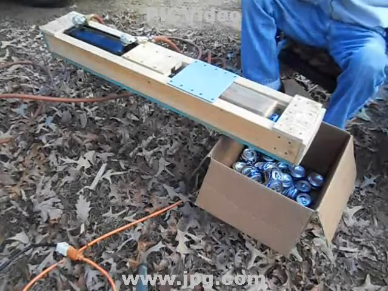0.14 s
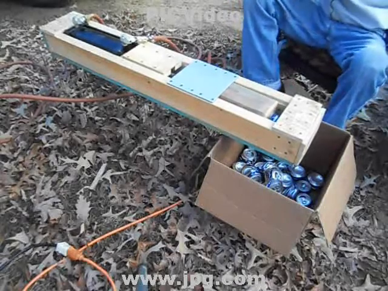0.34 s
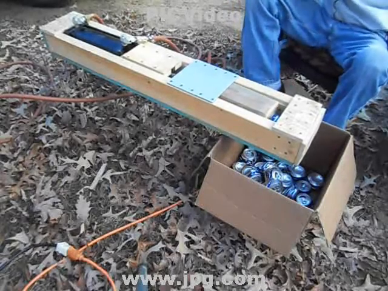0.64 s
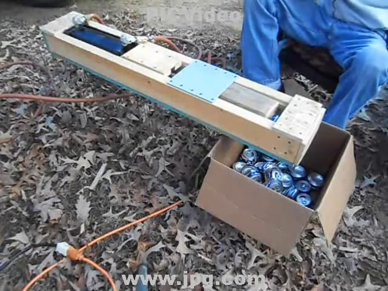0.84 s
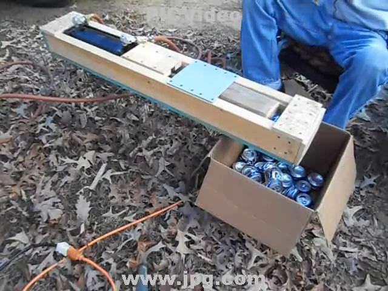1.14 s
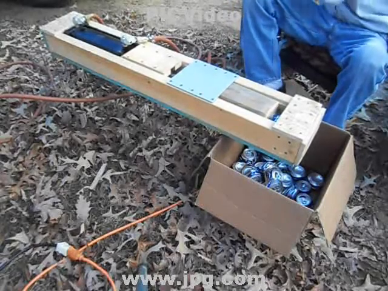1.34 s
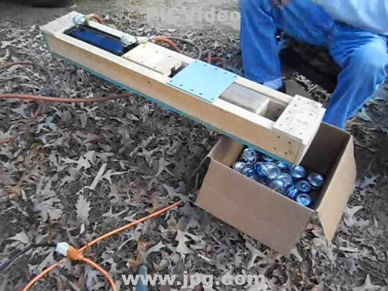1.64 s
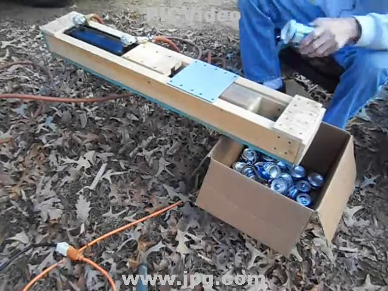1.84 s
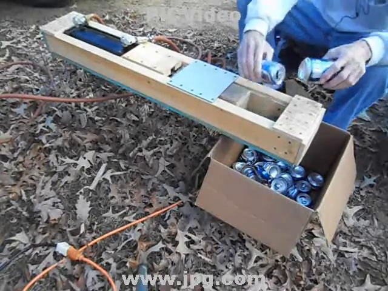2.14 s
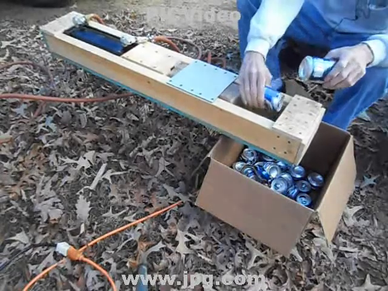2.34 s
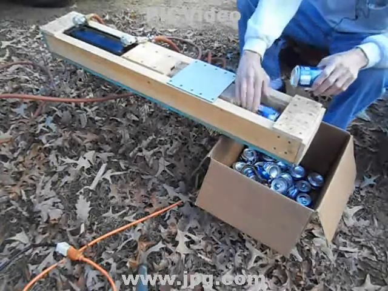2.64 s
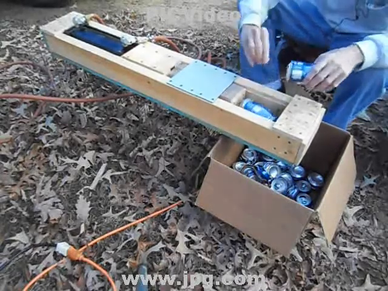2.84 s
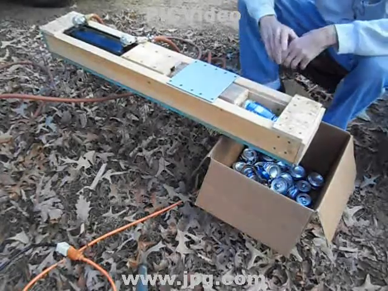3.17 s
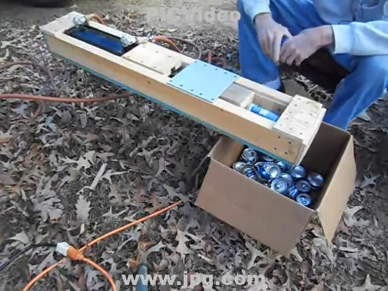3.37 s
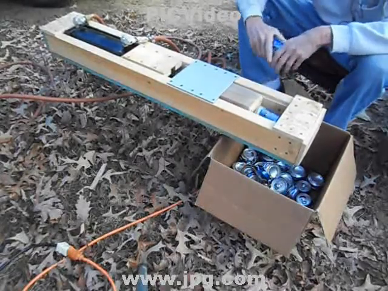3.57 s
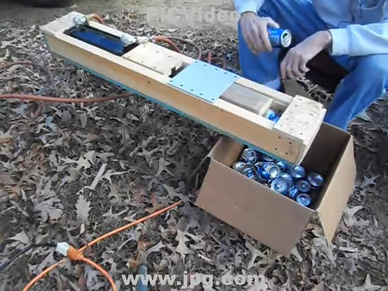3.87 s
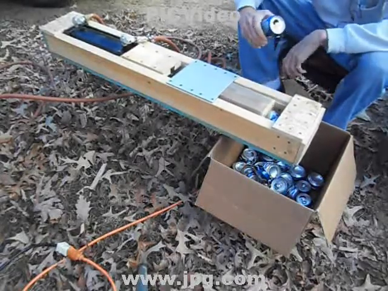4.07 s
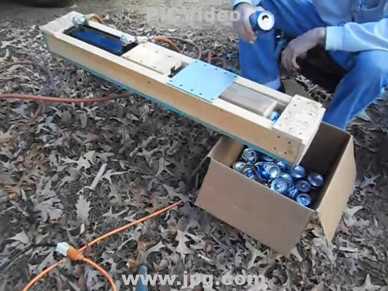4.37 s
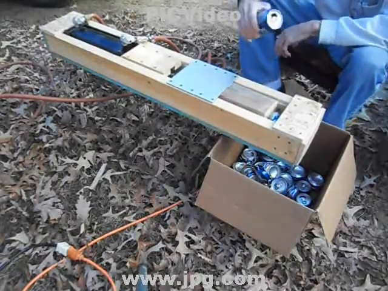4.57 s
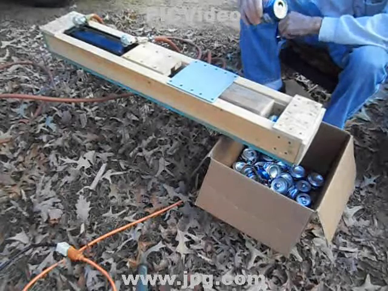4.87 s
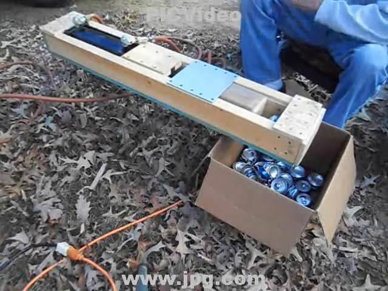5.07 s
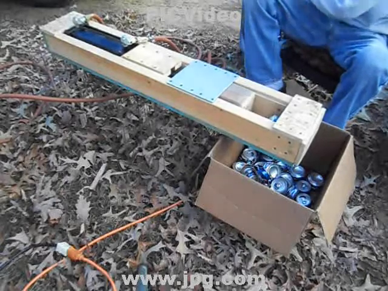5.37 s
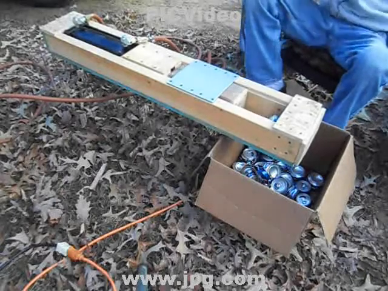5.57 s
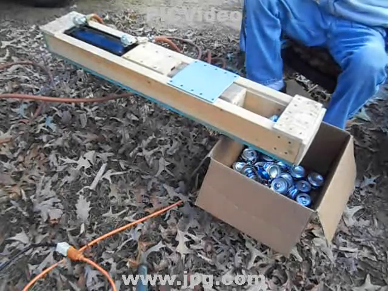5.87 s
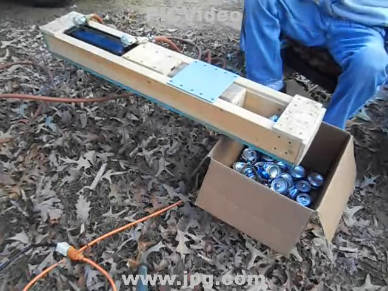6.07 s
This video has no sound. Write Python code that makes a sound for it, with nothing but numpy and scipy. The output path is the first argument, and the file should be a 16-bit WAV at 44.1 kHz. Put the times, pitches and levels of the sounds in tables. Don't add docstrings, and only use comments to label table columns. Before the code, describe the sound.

Outdoors, bursts of venting compressed air alternate with a can clattering into a wooden trough and its thin metal crackling as it is crushed.

```python
import sys
import numpy as np
from scipy import signal
from scipy.fft import rfft, irfft, next_fast_len
from scipy.io import wavfile
from scipy.ndimage import uniform_filter1d, map_coordinates

SR = 44100
rng = np.random.default_rng(int(sys.argv[2]) if len(sys.argv) > 2 else 0)


def transcribe(u):
    v = np.clip(np.atleast_2d(u).T, -1, 1)
    q = np.round(v * 32767).astype(np.int16)
    wavfile.write(sys.argv[1], SR, q)


def gain_from_db(level_db):
    decades = np.asarray(level_db, float) / 20
    return 10 ** decades


N = 273861
T = np.arange(N) / SR
FULL_FLOW_DB = -16
CONVERTER_HZ = 10850

# (time [s], level [dB])
RETURN_STROKES = [
    [(1.246, -23.5), (1.255, -16), (1.267, -9), (1.32, -13.5), (1.75, -16.8), (2.3, -15.5), (2.52, -21.5),
     (2.64, -32.5), (2.727, -48)],
    [(4.673, -51), (4.69, -17), (4.792, -16), (5.03, -18), (5.7, -17), (5.85, -23), (5.922, -31),
     (6.04, -42), (6.14, -72)],
]
# (time [s], level [dB])
CRUSH_STROKE = [
    (2.972, -39),
    (2.982, -13.5),
    (3.0, -15),
    (3.17, -19.5),
    (3.3, -21.5),
    (3.67, -23.5),
    (3.94, -29),
    (4.14, -41.5),
    (4.2, -76),
]
# (time [s], level [dB])
EARLIER_CRUSH = [
    (-0.3, -19),
    (0.0, -24.5),
    (0.012, -34),
    (0.085, -42),
    (0.13, -58),
    (0.2, -75),
]
# (frequency [Hz], width [Hz], level [dB])
RETURN_RESONANCES = [(873, 24, -8), (1347, 119, -8), (1728, 122, -6.5), (2326, 205, -5), (3410, 420, -4),
                     (4077, 340, -7.5), (4940, 330, -12), (5450, 210, -12.5), (6400, 62, -25)]
CRUSH_RESONANCES = [(1000, 250, -16), (1900, 300, -18), (2800, 220, -12), (3200, 200, -13), (4170, 240, 0),
                    (4800, 280, -1), (5370, 200, -5), (5720, 120, -9), (6000, 160, -5), (6500, 150, -11)]
# (frequency [Hz], density [dB per Hz])
JET_SPECTRUM = [(100, -59), (400, -23.5), (1500, -16), (3500, -14.5), (6000, -18), (6600, -25.5)]
# (frequency [Hz], density [dB per Hz])
RETURN_TREBLE = [(6600, 8), (6800, -1.5), (7800, -3.5), (8200, -9.5), (8600, -11), (9080, -3.5), (9500, -8),
                 (10100, 1.5), (10320, -5.5), (10600, -0.5), (10950, -15)]
CRUSH_TREBLE = [(3880, -29), (6600, 5), (6960, 0), (7620, -2), (8040, -9), (8310, -12.5), (9220, -3.5),
                (11000, -5), (14200, -37.5), (22000, -120)]
# (frequency [Hz], width [Hz], depth [0-1])
RETURN_NOTCHES = [(2735, 100, 0.67), (1990, 98, 0.4), (2650, 73, 0.3), (3880, 110, 0.7), (4600, 110, 0.5),
                  (5250, 90, 0.8), (5850, 100, 0.4), (7580, 60, .6), (8200, 200, .93), (8560, 70, .6),
                  (8810, 90, .7), (9280, 90, .5), (10300, 150, 0.3), (6620, 110, 0.5), (6400, 150, .4)]
CRUSH_NOTCHES = [(2580, 70, 0.7), (2970, 60, .5), (4545, 80, 0.6), (5150, 80, .4), (5560, 80, .5)]
# (delay [s], level [dB])
REFLECTIONS = [(.0031, -21.5), (.0074, -18), (0.0121, -21), (0.021, -18)]
# (frequency [Hz], width [Hz], relative level at opening [dB],
# gain with time [dB per s], regained as the jet weakens [dB per dB])
NARROW_TONES = [(1315, 120, -26.5, 4.5, 0.55), (3490, 260, -18.5, 5.5, 0.0337), (4120, 130, -17.5, 8, 0.02),
                (5020, 120, -26, 2.5, 0.07), (5400, 93, -26, 1.5, -0.04), (9100, 60, -29.5, -15, 0)]
# (time [s], peak [dB], relative rattle [dB], rattle t60 [s],
# relative ring [dB])
CAN_HITS = [(2.7307, -1, -6.5, 0.23, -30.5), (2.7337, -4, -6.5, 0.29, -37), (2.769, -15.5, 4, 0.047, -12),
            (2.826, -15.5, -22, .08, -32), (2.838, -20, -24, .08, -38), (2.9092, -16, 3, 0.02, -32),
            (2.9125, -9.5, -8.5, 0.15, -25.5), (2.986, -16.5, -1, 0.033, -19.5), (2.99, -14, 0, 0.17, -22),
            (3.225, -11.5, -5, 0.15, -40), (3.293, -13, 0, 0.18, -38), (3.356, -25, -9, .03, -30),
            (3.3645, -6.5, -2, 0.11, -38.5), (3.479, -16.5, -3, 0.083, -36), (3.593, -27, 9, 0.03, -31)]
# (frequency [Hz], level [dB], t60 [s])
CAN_MODES = [(780, -4, .2), (1103, -1, .7), (1176, -4, .5), (1433, -3, .42), (1540, -15, .17),
             (1670, -7, .1), (1836, -7, .12), (2201, -5, 1.5), (2890, 0, .12), (2995, 4, .15),
             (3311, 5, .08), (3623, -4, .14), (4097, 0, .13), (4335, 6, .13)]
# (time [s], peak [dB], dullness [dB], t60 [s])
WALL_BUCKLES = [(3.3695, -16, 7, 0.045), (3.3765, -22, 6, 0.038), (3.385, -26, 6, .02),
                (3.497, -27, 16, 0.017), (3.5496, -16, 6.5, 0.03), (3.5555, -31, 5, .015),
                (3.617, -33, 13, 0.013), (3.6263, -19, 3.5, 0.007), (3.749, -27, -8, 0.033),
                (3.7567, -20, 2.5, 0.013), (3.787, -6, -3, 0.02), (3.7966, -13.5, 5.5, 0.019),
                (3.823, -29.5, 17, 0.019), (3.833, -6.5, -17, 0.024), (3.848, -30, 7, 0.021),
                (3.951, -14.5, -25, 0.019), (3.964, -15, -27, 0.0073), (3.9701, -26.5, 4, 0.023),
                (4.016, -29, 12.5, 0.0072), (4.0252, -36, 11, 0.014), (4.059, -7.5, -15.5, 0.015),
                (4.1418, -24, -30, 0.0184), (4.15, -13.5, -14.5, 0.016), (4.203, -37, 5, 0.017)]
# (time [s], peak [dB], dullness [dB], t60 [s], pitch [Hz])
VALVE_TICKS = [(0.0, -22, 3.5, 0.0071, 7600), (0.0293, -23, -25, 0.033, 7000), (0.04, -30, -8, 0.022, 8500),
               (0.0445, -34, 5, 0.028, 7000), (0.0677, -25.5, -19, 0.021, 7900),
               (0.091, -25.5, -17, 0.015, 7440), (0.1114, -38, -19, 0.03, 6600),
               (0.2285, -52, -4, 0.025, 8000), (0.2614, -37, -18, 0.05, 7300),
               (0.407, -28.5, -7, 0.029, 7260), (0.4322, -27, -31, 0.023, 6040),
               (0.6525, -22.5, -39, 0.021, 7300), (0.728, -9, -32, 0.02, 6900),
               (0.7285, -17, -36, 0.016, 5700), (0.784, -44, -11, 0.025, 7000),
               (0.8125, -21.5, -34, 0.029, 7900), (0.9287, -35, -20, 0.046, 8300),
               (1.1812, -26.5, -29.5, 0.02, 9000), (1.184, -1, -12.5, 0.017, 9100),
               (1.2346, -25, -15.5, 0.014, 6000), (1.2378, -22.5, -18, 0.012, 6400),
               (1.6511, -18.5, -28, 0.15, 7970), (2.6807, -33, 0, 0.031, 8060),
               (4.2062, -35, -20, 0.048, 7000), (4.485, -19.5, -4.5, 0.021, 7860),
               (4.5621, -24, -9.5, 0.039, 7300), (4.6114, -50, 9.5, 0.035, 7000)]
# (time [s], length [s], start [Hz], end [Hz], level [dB], relative third partial [dB])
FOLD_SQUEAKS = [
    (3.552, 0.009, 2750, 3000, -24, -12),
    (3.567, 0.011, 2555, 2620, -15, -12),
    (3.595, 0.0134, 2626, 2315, -13, -8),
    (3.6047, 0.0065, 2700, 2810, -13, 1),
    (3.609, 0.012, 2810, 2780, -29, 2),
]
# (time [s], peak [dB], start [Hz], end [Hz], t60 [s])
PANEL_POPS = [(0.408, -39, 1430, 1420, .03), (0.433, -40, 1420, 1420, 0.025),
              (1.246, -11.5, 540, 420, 0.03), (1.247, -18, 770, 724, 0.036),
              (1.256, -13.5, 620, 530, 0.028), (1.69, -15, 1400, 1410, 0.065),
              (2.355, -17, 1100, 1080, .03), (2.357, -24, 540, 517, 0.024), (2.362, -25, 397, 380, 0.069),
              (2.737, -15, 4310, 4280, .04), (2.767, -12, 810, 776, 0.048), (2.874, -36, 400, 400, 0.026),
              (2.886, -31, 1750, 1750, 0.022), (2.922, -18, 830, 814, .05), (2.992, -19.5, 744, 704, 0.075),
              (3.074, -25.5, 1050, 1040, 0.026), (3.169, -29, 560, 520, .03),
              (3.1745, -23.5, 400, 373, 0.05), (3.186, -18, 1040, 1030, 0.023),
              (3.364, -7.5, 1340, 1350, 0.035), (3.376, -24, 790, 770, 0.04), (3.411, -20, 710, 755, .06),
              (3.5494, -12, 1080, 1060, 0.013), (3.5911, -12, 1940, 1880, 0.0063),
              (3.592, -9, 4200, 4150, .012), (3.757, -23, 1520, 1500, 0.023),
              (3.822, -16, 1330, 1310, .025), (4.015, -10.5, 3380, 3390, 0.018),
              (4.804, -22, 497, 475, 0.029), (4.808, -19, 460, 416, 0.065), (4.808, -18, 730, 700, .03),
              (4.819, -22, 630, 610, 0.05), (5.7, -21, 1150, 1110, .025), (5.705, -17, 770, 386, 0.092),
              (5.708, -21, 1050, 1050, 0.024), (1.2452, -23, 303, 269, 0.038), (1.386, -27, 302, 270, 0.11),
              (4.806, -26, 286, 258, 0.1), (3.787, -33, 320, 273, 0.06), (4.206, -43, 900, 800, .02),
              (4.486, -39, 420, 382, 0.035), (4.561, -46, 1000, 900, .02)]
# (time [s], peak [dB], pitch [Hz], relative bright first tap [dB])
WOOD_KNOCKS = [(0.228, -51, 300, -18), (0.498, -32, 720, -1), (0.775, -54, 266, -2), (0.916, -30, 264, -26),
               (1.125, -28, 805, -2), (1.378, -22.5, 513, -15), (1.386, -16, 510, -23),
               (1.651, -22, 735, 1), (1.72, -26.5, 794, 5.5), (2.504, -25.5, 760, -11),
               (3.415, -17.5, 455, -13), (3.446, -23, 565, -16), (3.485, -20, 473, -2),
               (3.498, -17.5, 590, 1.5), (3.716, -29.5, 430, -14), (3.988, -36.5, 780, 1),
               (4.089, -45, 450, 6), (4.431, -49, 443, -20.5), (4.916, -26, 710, 8), (6.187, -35, 523, -2)]
# (peak time [s], leaves [dB], rise [s per 20 dB], fall [s per 20 dB],
# dullness [dB])
RUBS = [(0.1, -59, 6, 0.1, -5), (0.23, -51.5, 0.04, 0.3, 8.5), (0.29, -67, -0.2, 0, 10),
        (0.43, -60, -1.3, -0.3, -3), (0.502, -53.5, .004, 0.12, 10), (0.57, -61, 0.02, -0.16, 16),
        (0.64, -58, 0.03, 0.2, 6.5), (0.745, -49, -0.01, 0.18, 8.5), (0.79, -64, -0.16, 1, 8.5),
        (0.913, -46, -0.02, 0.14, 10), (0.947, -48.5, 0.1, 0, -3), (1.06, -51, 0.18, 0.06, 1),
        (1.171, -43, 0.22, 0, 2.5), (1.66, -28, -0.02, 0.47, -15), (2.74, -41.5, .5, 1.05, -15),
        (2.958, -37.5, 0.18, 0.45, -26), (4.205, -69, 2, 0.3, -10.5), (4.49, -59, -0.35, 0.1, -2),
        (5.96, -48.5, 0.5, 1.5, -4), (6.12, -50.5, 0.1, 0.2, -19), (6.19, -51.5, -0.1, 4, -23.5)]
# (resting level [dB], relative level in a rub [dB],
# share of dullness [0-1])
RUB_LAYERS = [(-78, -4, 1), (-69, 0.5, 0.43), (-65.5, -1, 0.16), (-73.5, -4.5, 0)]
# (time [s], frequency [Hz], level [dB])
BOX_CREAKS = [
    [(0.142, 720, -75), (0.15, 720, -51), (0.168, 690, -54), (0.178, 680, -75)],
    [(4.365, 620, -80), (4.385, 574, -61), (4.415, 560, -62), (4.428, 545, -80)],
]
# (time [s], frequency [Hz], level [dB])
WHISTLE = [
    (4.185, 7800, -75),
    (4.192, 7950, -60),
    (4.23, 8000, -61),
    (4.27, 7200, -63),
    (4.285, 7000, -69),
    (4.35, 6900, -67),
    (4.385, 7500, -62),
    (4.405, 8500, -66),
    (4.415, 8700, -80),
]
# (time [s], level [dB], rise and fall [s per 20 dB])
PUFFS = [(0.08, -58, 1), (0.32, -41, -0.26), (0.58, -52, -0.06), (0.83, -47.5, 0.05), (1.05, -53, 0.2),
         (1.2, -46, 0.18), (1.34, -58, 0.2), (1.68, -50, 0.07), (2.1, -69, -0.2), (2.76, -58, 0.2),
         (2.97, -58, .5), (3.3, -56, 0.2), (3.55, -56, 0.3), (3.79, -46.5, -0.02), (4.02, -55, 0),
         (4.82, -61, 0.14), (5.04, -53, 0.23), (5.38, -61, -0.1), (5.71, -60, -0.3), (6.2, -50, 0.7)]


def rms_one(x):
    return x / np.sqrt(np.mean(x ** 2) + 1e-20)


def peak_one(x):
    return x / np.abs(x).max()


def in_time(tables):
    out = np.full((len(tables[0][0]) - 1, N), -120.)
    for rows in tables:
        s, *columns = np.transpose(rows)
        inside = (T >= s[0]) & (T <= s[-1])
        out[:, inside] = [np.interp(T[inside], s, c) for c in columns]
    return out


def seconds_open(strokes):
    spans = [(rows[0][0], rows[-1][0]) for rows in strokes]
    opened, = in_time([[(start, 0), (end, end - start)] for start, end in spans])
    return opened.clip(0)


def at_hz(points, hz):
    table = np.array(points)
    return gain_from_db(np.interp(np.log(hz), np.log(table[:, 0]), table[:, 1]))


def band(x, low_hz, high_hz, order=2):
    return signal.sosfilt(signal.butter(order, [low_hz, high_hz], "band", fs=SR, output="sos"), x)


def flicker(rate, depth_db):
    r = np.exp(-2 * np.pi * rate / SR)
    slow = signal.lfilter([1], [1, -2 * r, r * r], rng.standard_normal(N + SR))[SR:]
    return gain_from_db(depth_db * rms_one(slow))


def swell(s, rise, fall):
    return gain_from_db(-20 * np.where(T < s, (s - T) / max(rise, .002), (T - s) / max(fall, .002)))


def ring(drive, hz, t60):
    r, w = gain_from_db(-60 / (t60 * SR)), 2 * np.pi * hz / SR
    return signal.lfilter([0, np.sin(w)], [1, -2 * r * np.cos(w), r * r], drive + 1e-18)


def add(out, s, sound):
    i = round(s * SR)
    out[i:i + len(sound)] += sound[:N - i]


def patchy(x):
    eddy_hz, eddy_s, depth_db = 140, .1, 1.5
    hz, s, bins = signal.stft(x, SR, nperseg=1024)
    field = rng.standard_normal((int(SR / 2 / eddy_hz) + 2, int(N / SR / eddy_s) + 3))
    places = np.meshgrid(hz / eddy_hz, s / eddy_s, indexing="ij")
    gain = gain_from_db(depth_db * map_coordinates(field, places, order=3))
    return signal.istft(bins * gain, SR, nperseg=1024)[1][:N]


def vent(strokes, port, top, hiss_db, roar_db, core_hz, between_db, dips, sag_db_per_s=0):
    jet_db, = in_time(strokes)
    opened = seconds_open(strokes)
    steady_db, extra_db, extra_s, loss_db_per_s = hiss_db
    top_db = steady_db + extra_db * np.exp(-opened / extra_s) - loss_db_per_s * opened
    full_db, regain = roar_db
    low_db = full_db + regain * (FULL_FLOW_DB - jet_db)

    size = next_fast_len(N)
    hz = np.maximum(np.arange(size // 2 + 1) * SR / size, 1)
    power = (gain_from_db(between_db) * at_hz(JET_SPECTRUM, hz)) ** 2
    for centre, width, db in port:
        power += gain_from_db(db) ** 2 / (1 + np.abs(2 * (hz - centre) / width) ** 2.8)
    colour = np.where(hz < 6600, np.sqrt(power), at_hz(top, hz))
    air = rfft(rng.standard_normal(size)) * colour
    air *= 1 + sum(gain_from_db(db) * np.exp(-2j * np.pi * hz * lag) for lag, db in REFLECTIONS)
    for centre, width, depth in dips:
        air *= 1 - depth / (1 + (2 * (hz - centre) / width) ** 2)
    air = rfft(patchy(irfft(air, size)[:N]), size)

    ranges = [hz < 2650, (hz >= 2650) & (hz < 6600), (hz >= 6600) & (hz < 12000)]
    low, middle, high = [rms_one(irfft(air * part, size)[:N]) for part in ranges]
    hz = np.arange(N // 2 + 1) * SR / N
    core_shape = 1 / (1 + (2 * (hz - np.mean(core_hz)) / np.ptp(core_hz)) ** 6)
    core = irfft(rfft(middle) * core_shape, N)
    flanks_db = np.minimum(0.46 * (jet_db - FULL_FLOW_DB), 0)
    middle = core + gain_from_db(flanks_db) * (middle - core)
    low_flank = irfft(rfft(middle) * (hz < 3415), N)
    middle = middle + (gain_from_db(sag_db_per_s * (0.4 - opened)) - 1) * low_flank

    roar = gain_from_db(jet_db + np.minimum(low_db, 0)) * flicker(1.9, 0.91) * low
    body = gain_from_db(jet_db) * flicker(1.9, 0.91) * middle
    treble = gain_from_db(jet_db + np.minimum(top_db, 0)) * flicker(1.9, 0.91) * high
    return flicker(81, 0.58) * (roar + body + treble)


def return_jet():
    # steady dB, extra dB at opening, its decay s, loss dB per s
    return vent(RETURN_STROKES, RETURN_RESONANCES, RETURN_TREBLE, hiss_db=(-19.5, 11.5, 0.05, 4),
                roar_db=(-13, 0.14), core_hz=(2650, 5700), between_db=0.5, dips=RETURN_NOTCHES, sag_db_per_s=4.5)


def crush_jet():
    return vent([EARLIER_CRUSH, CRUSH_STROKE], CRUSH_RESONANCES, CRUSH_TREBLE, hiss_db=(-13, 2, 0.5, 9.5),
                roar_db=(-17, 0.066), core_hz=(3400, 5200), between_db=4.0, dips=CRUSH_NOTCHES)


def port_tones():
    jet_db, = in_time(RETURN_STROKES)
    opened = seconds_open(RETURN_STROKES).clip(0, 1.2)
    weaker_db = np.clip(FULL_FLOW_DB - jet_db, 0, 40)
    hz = np.arange(N // 2 + 1) * SR / N
    air = rfft(rng.standard_normal(N))
    waver = [flicker(9.6, 2) for _ in range(2)]
    out = np.zeros(N)
    for k, (centre, width, db, gain_db, regain) in enumerate(NARROW_TONES):
        tone = rms_one(irfft(air / (1 + (2 * (hz - centre) / width) ** 2), N))
        level_db = jet_db + db + gain_db * opened + regain * weaker_db
        out += np.roll(waver[k % 2], k * SR) * gain_from_db(level_db) * tone
    return out


def can():
    out, t = np.zeros(N), T[:SR // 2]
    click = (t == 0) * 1.
    for s, db, rattle_db, rattle_t60, ring_db in CAN_HITS:
        touch_s = 0.00042 * gain_from_db(-0.46 * db)
        press = np.sin(np.pi * np.minimum(t / touch_s, 1)) ** 2
        thump = ring(press, 1000, 0.029) + 0.11 * ring(press, 760, 0.15) + 0.3 * ring(press, 1200, 0.016)
        noise = rng.standard_normal(len(t)) * gain_from_db(-60 * t / rattle_t60)
        rattle = band(noise, 2580, 4300) + 1.83 * band(noise, 764, 1300) + 1.06 * band(noise, 1140, 2080)
        spread_db = rng.normal(0, 2, len(CAN_MODES))
        wall = sum(gain_from_db(level + e) * ring(click, hz, t60) for (hz, level, t60), e in zip(CAN_MODES, spread_db))
        wall = wall * np.cos(np.pi * t)
        hit = peak_one(thump) + gain_from_db(rattle_db) * peak_one(rattle) + gain_from_db(ring_db) * wall
        add(out, s, gain_from_db(db) * band(hit, 600, 10000))
    return out


def cracks(rows, middle_db, dull_share):
    out, t = np.zeros(N), T[:SR // 8]
    span = 1.256
    for s, db, low_db, t60, hz in rows:
        noise = rng.standard_normal((3, len(t)))
        rise = np.minimum(t / .0004, 1)
        shape = rise * (gain_from_db(-60 * t / max(t60, .005)) + gain_from_db(-26.5 - 60 * t / 0.11))
        high = band(noise[0] * shape, hz / span, min(hz * span, CONVERTER_HZ))
        middle = band(noise[1] * shape, 0.4 * hz, 0.63 * hz, order=3)
        low = band(noise[2] * shape, 900, 3140)
        add(out, s, gain_from_db(db) * peak_one(high))
        add(out, s, gain_from_db(db + middle_db + dull_share * low_db) * peak_one(middle))
        add(out, s, gain_from_db(db + low_db) * peak_one(low))
    return out


def buckles():
    return cracks([(*row, 7300) for row in WALL_BUCKLES], middle_db=6.2, dull_share=0.45)


def ticks():
    return cracks(VALVE_TICKS, middle_db=4.2, dull_share=0.37)


def squeaks():
    out = np.zeros(N)
    for s, length, start_hz, end_hz, db, third_db in FOLD_SQUEAKS:
        size = round(length * SR)
        jitter, grip = rng.standard_normal((2, SR // 40))[:, :size]
        hz = np.linspace(start_hz, end_hz, size) * (1 + .15 * jitter)
        phase = 2 * np.pi * np.cumsum(hz) / SR
        partials_db = [-3, 0, third_db, -15]
        stack = sum(gain_from_db(p) * np.sin((k + 1) * phase + k * k) for k, p in enumerate(partials_db))
        stutter = gain_from_db(3.5 * rms_one(uniform_filter1d(grip, size=40)))
        add(out, s, gain_from_db(db) * band(stack, 1500, 11000) * stutter * np.hanning(size) ** .35)
    return out


def pops():
    out, t = np.zeros(N), T[:SR // 8]
    for s, db, start_hz, end_hz, t60 in PANEL_POPS:
        hz = end_hz + (start_hz - end_hz) * np.exp(-t / 0.0066)
        shape = (1 - np.exp(-t * start_hz / 0.9)) * gain_from_db(-60 * t / max(t60, .005))
        rough = rms_one(band(rng.standard_normal(len(t)), 0.6 * end_hz, 1.4 * start_hz))
        swing = np.sin(2 * np.pi * np.cumsum(hz) / SR)
        add(out, s, gain_from_db(db) * peak_one(shape * (swing + 0.45 * rough)))
    return out


def knocks():
    out, t = np.zeros(N), T[:SR // 5]
    for s, db, hz, tap_db in WOOD_KNOCKS:
        t60 = 18 / hz
        noise = rng.standard_normal((2, len(t)))
        push = noise[0] * np.minimum(t / 0.0017, 1) * gain_from_db(-60 * t / 0.048)
        wood = ring(push, hz, t60) + 0.1 * ring(push, 0.87 * hz, 0.5 * t60)
        wood += 0.57 * ring(push, 1.2 * hz, 0.4 * t60) + 0.85 * ring(push, 1.33 * hz, 0.69 * t60)
        tap = band(noise[1] * gain_from_db(-60 * t / 0.066), 706, 1500)
        add(out, s, gain_from_db(db) * (peak_one(band(wood, 350, 2900)) + gain_from_db(tap_db) * peak_one(tap)))
    return out


def shuffle():
    shapes = np.array([swell(s, rise, fall) for s, _, rise, fall, _ in RUBS])
    _, db, _, _, dull_db = np.transpose(RUBS)
    grain = rng.standard_normal((4, N)) * gain_from_db(3.0 * rng.standard_normal(N))
    drone = ring(band(grain[0], 208, 400), 256, 0.025)
    cloth = band(grain[1], 400, 1360)
    leaves = band(grain[2], 2430, 4930)
    rustle = band(grain[3], 6200, 9400)
    out = np.zeros(N)
    for (rest_db, rel_db, share), x in zip(RUB_LAYERS, [drone, cloth, leaves, rustle]):
        gain = gain_from_db(rest_db) + gain_from_db(db + rel_db + share * dull_db) @ shapes
        out += gain * flicker(38, 1.8) * rms_one(x)
    return flicker(24, 1.36) * out


def whistle(tables):
    hz, db = in_time(tables)
    return np.sqrt(2) * gain_from_db(db) * np.sin(2 * np.pi * np.cumsum(hz) / SR)


def creaks():
    return whistle(BOX_CREAKS)


def bird():
    return whistle([WHISTLE])


def wind():
    calm, puffs = rng.standard_normal((2, N))
    rumble = gain_from_db(-66) * rms_one(band(calm, 10, 400, order=1))
    gusts = sum(gain_from_db(db) * swell(s, span, span) for s, db, span in PUFFS)
    return rumble + gusts * flicker(14, 1.3) * rms_one(band(puffs, 8.7, 170, order=1))


def hiss():
    return gain_from_db(-65) * rms_one(band(rng.standard_normal(N), 1500, 14000, order=1))


def scene():
    air = return_jet() + crush_jet() + port_tones()
    metal = can() + buckles() + squeaks()
    wood = ticks() + pops() + knocks()
    background = shuffle() + creaks() + bird() + wind() + hiss()
    return np.tile(air + metal + wood + background, (2, 1))


def band_limit(x):
    return signal.sosfilt(signal.butter(12, 16650, fs=SR, output="sos"), x)


def record(dry):
    x = signal.sosfilt(signal.cheby1(10, .5, CONVERTER_HZ, fs=SR, output="sos"), dry)
    x = x * (1 + (-1.) ** np.arange(N))
    x = signal.sosfilt(signal.butter(4, 14300, fs=SR, output="sos"), x)
    x = signal.sosfilt(signal.ellip(12, .5, 75, 15450, fs=SR, output="sos"), x)
    mix = np.clip(x, -1, 1)
    return band_limit(mix)


dry = scene()
out = record(dry)
transcribe(out)
```